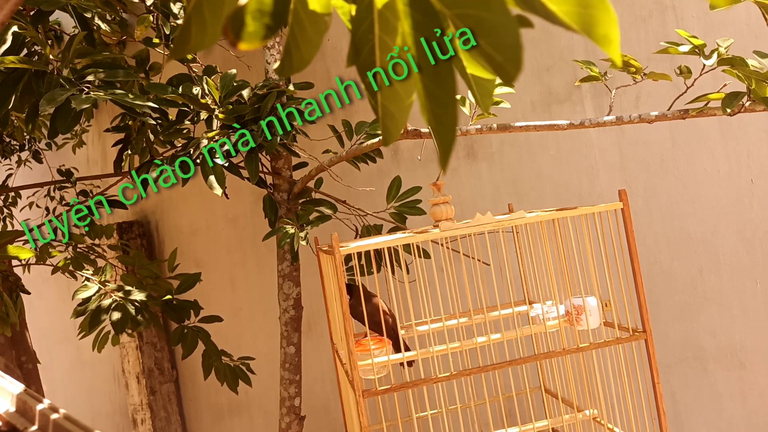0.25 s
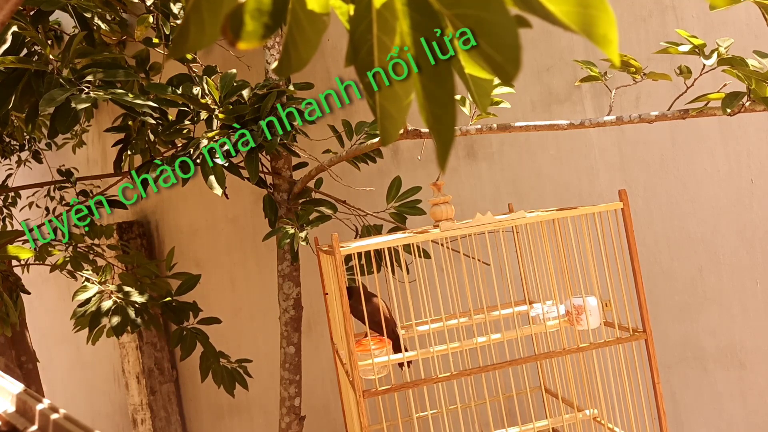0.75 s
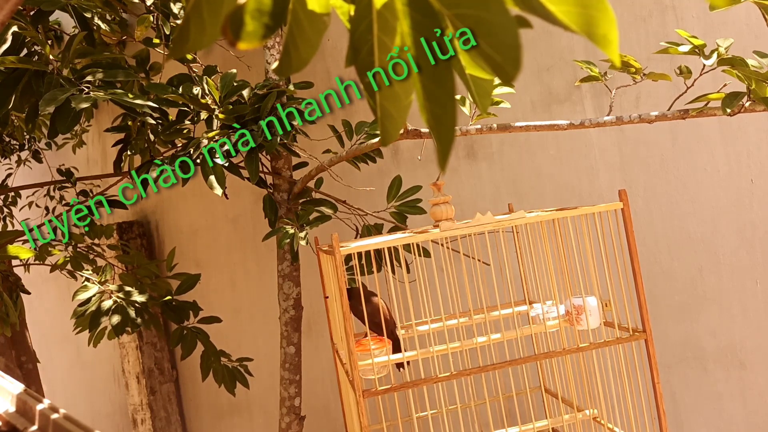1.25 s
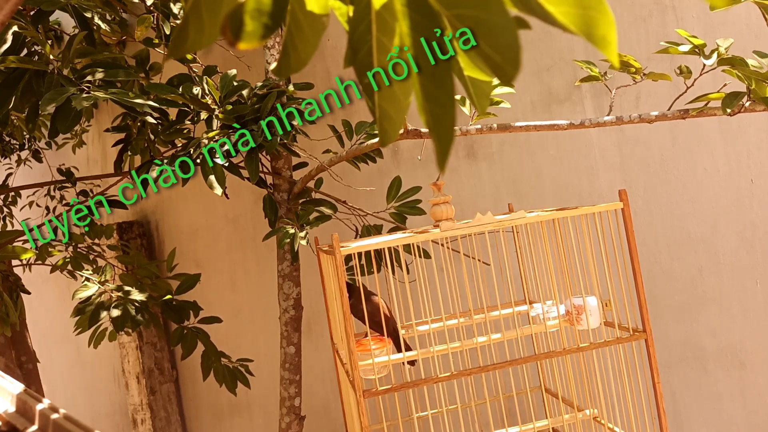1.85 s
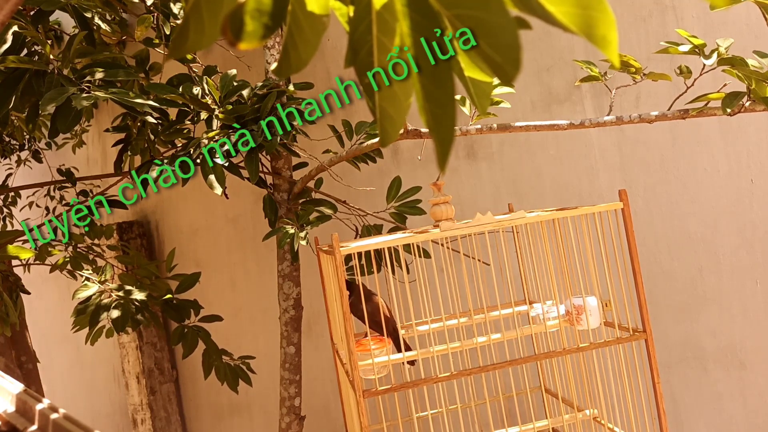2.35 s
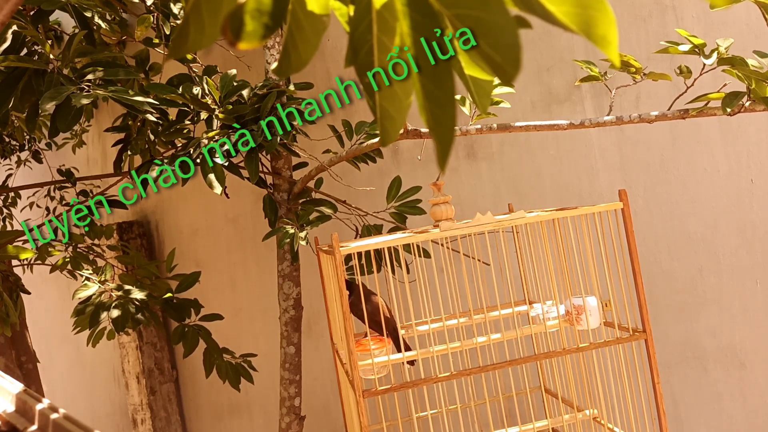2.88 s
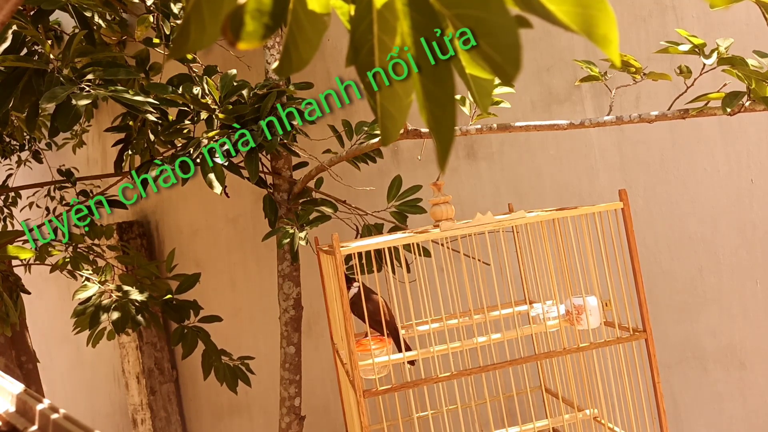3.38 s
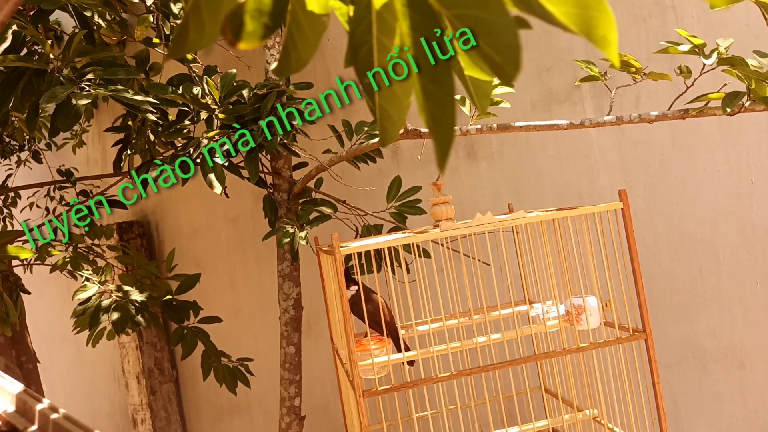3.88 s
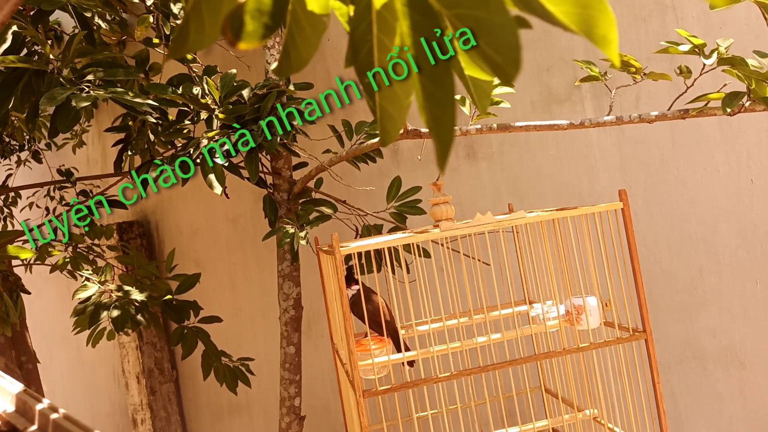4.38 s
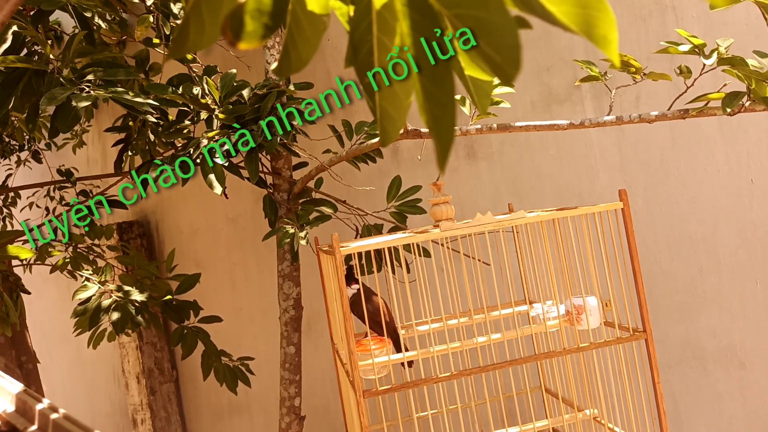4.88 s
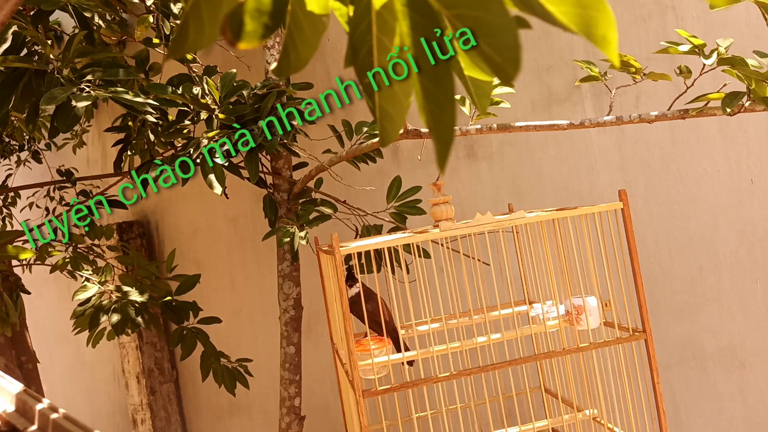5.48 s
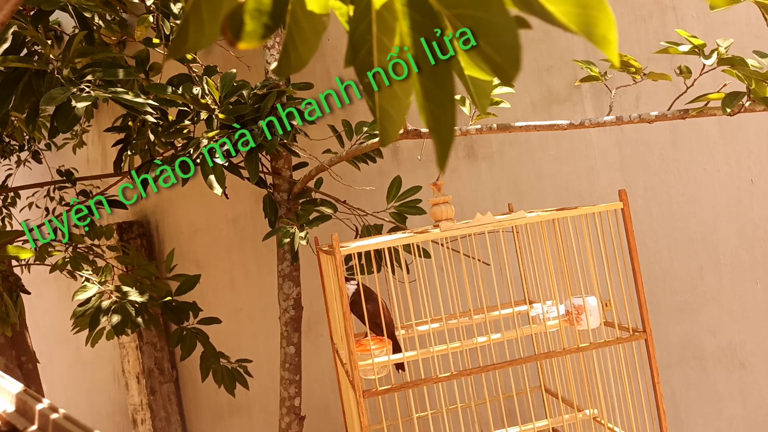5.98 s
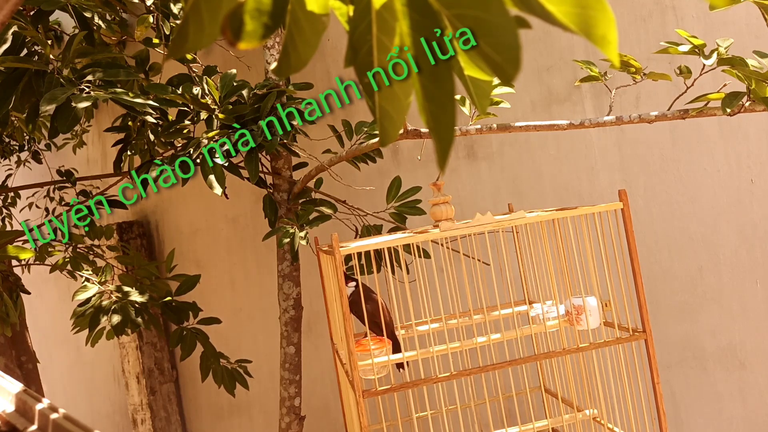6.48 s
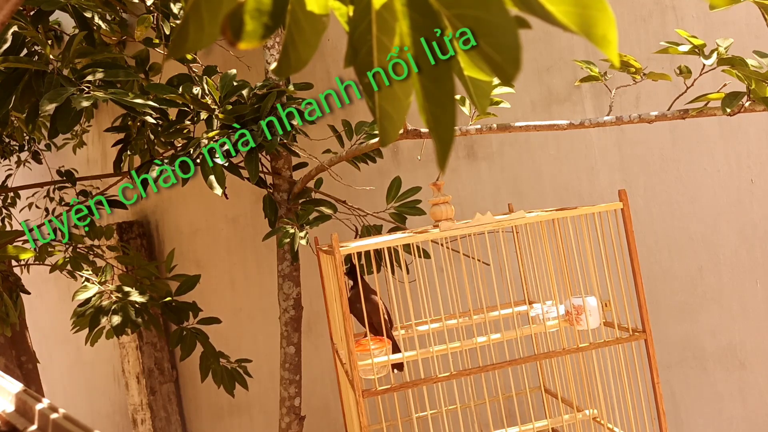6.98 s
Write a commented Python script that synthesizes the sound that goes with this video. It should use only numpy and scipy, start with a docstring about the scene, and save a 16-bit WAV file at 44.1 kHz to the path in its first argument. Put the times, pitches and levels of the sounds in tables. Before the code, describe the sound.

Scattered raspy chirps and a brief whistled song from a nearby bird, with constant high hiss and faint distant birds.

```python
"""A caged bulbul sings in a walled yard: four buzzy arched calls and a quick phrase of slurred whistles,
which it begins again at the end. Each note is one gliding tone, modulated in frequency and amplitude by
a fast trill; the near walls return it as early reflections and a faint reverberation.
Other birds answer from far off, over a steady high hiss, faint distant noise and a low outdoor rumble."""
import sys
import numpy as np
from scipy import signal
from scipy.fft import rfft, irfft
from scipy.io import wavfile

SR = 44100
rng = np.random.default_rng(int(sys.argv[2]) if len(sys.argv) > 2 else 0)


def dump(signal):
    """Clip the signal to [-1, 1] and save it as 16-bit WAV at the path in sys.argv[1]."""
    limited = np.clip(np.atleast_2d(signal).T, -1, 1)
    pcm = np.round(limited * 32767).astype(np.int16)
    wavfile.write(sys.argv[1], SR, pcm)


N = 319284
TIME = np.arange(N) / SR

# spectrum of still air: f/Hz, relative density/dB
AIR_SPECTRUM = [(25, -19.5), (45, -0.5), (110, 2), (260, -0.5), (450, -9), (800, -6.5), (1500, -19),
                (2500, -15), (3500, -15.5)]
# spectrum of the rumble: f/Hz, relative density/dB
RUMBLE_SPECTRUM = [(30, -25), (55, -9.5), (100, 7), (135, 5), (200, -18.5), (350, -34.5)]
# Gaussian swells of the rumble: t of peak/s, half-width/s, level/dB
RUMBLE_PEAKS = [(.06, .05, -66), (.59, 0.095, -62), (0.839, .04, -73), (2.25, 0.015, -69),
                (3.55, 0.058, -81), (3.929, 0.029, -74), (5.46, .08, -71), (6.77, .05, -71),
                (7.03, 0.046, -69), (7.23, 0.047, -68)]
# narrow bands of distant noise: f/Hz, mean level/dB
FAR_BANDS = [(230, -99.5), (330, -97), (460, -99), (620, -87.5), (850, -87.5), (1100, -91.5), (1500, -89.5),
             (2300, -91), (3000, -99.5)]
# spectrum of the hiss: f/Hz, relative density/dB
HISS_SPECTRUM = [(1650, -57.5), (2800, -37.5), (2990, -41), (3500, -31.5), (4940, -4.5), (6350, 2.5),
                 (7490, -1), (8000, -12.5), (8290, -11.5), (8720, -19), (9850, -25), (11700, -41.5),
                 (13600, -42), (14800, -33.5), (15600, -39)]
# narrow tones in the hiss: f/Hz, relative level/dB
HISS_TONES = [(5109, -82), (5728, -83.5), (6234, -72), (6584, -64), (7197, -73), (8193, -80.5)]
# distant chirps and low calls, likely birds: t/s, duration/s, start f/Hz, end f/Hz, relative level/dB
FAR_GLIDES = [(0.0, 0.16, 2982, 2683, -53.5), (0.0, .13, 696, 1169, -69), (0.009, 0.18, 1436, 1540, -66.5),
              (1.3, 0.283, 808, 846, -76), (1.652, 0.11, 2127, 2173, -73.5), (1.797, 0.23, 1850, 1894, -72),
              (1.816, 0.19, 1200, 1233, -78), (2.718, 0.48, 689, 894, -74), (3.165, 0.22, 1332, 1585, -72),
              (3.256, 0.11, 1017, 966, -72), (3.587, 0.086, 658, 711, -69), (3.642, .15, 263, 244, -76),
              (3.665, 0.093, 3244, 2700, -64.5), (3.959, 0.068, 2080, 2390, -64),
              (4.019, 0.27, 685, 726, -68.5), (4.08, 0.07, 3190, 3120, -67.5),
              (4.157, 0.14, 2057, 2230, -66), (4.272, 0.064, 2690, 3090, -61), (4.543, .11, 844, 613, -73),
              (4.899, 0.12, 331.4, 272, -78.5), (5.09, 0.38, 701, 707.4, -69.5),
              (5.658, 0.055, 2980, 4080, -53.5), (6.032, .089, 652, 862, -73.5),
              (6.078, .18, 2716, 2698, -60), (6.252, .24, 763, 681, -75.5), (6.555, 0.046, 4090, 2905, -65),
              (7.019, .1, 691, 799, -70)]
# early reflections from the near walls: delay/ms, level/dB
WALL_ECHOES = [(3.1, -10.5), (5.0, -19.5), (7.6, -8), (10.3, -16), (15.7, -21.5), (29.7, -19.5)]
# harmonics of the whistle: harmonic number, relative level/dB
HARMONICS = [(2, -32.5), (3, -40), (4, -46), (5, -39), (6, -40), (7, -43.5)]
# spectral weighting of harmonics and rasp: f/Hz, gain/dB
BUZZ_RESPONSE = [(600, -12), (1500, -17.5), (2500, 5), (4500, -2.5), (6200, 8.5), (7500, -1), (8500, 2),
                 (10300, -4.5), (12000, -8), (13600, -16), (15200, -1.5)]
# arched calls: t/s, rise/s, fall/s, start f/Hz, top f/Hz, end f/Hz, rise exponent, relative level/dB,
# initial trill rate/Hz, mean trill depth/Hz, early harshness/dB, final harshness/dB
ARCHED_CALLS = [(.251, 0.082, .056, 2460, 3394, 2808, 2.1, -21, 170.2, 185, -9, 3),
                (4.722, 0.079, .032, 3000, 3856, 3647, 1.8, -19.5, 296, 230, 14.5, 0),
                (5.905, .092, .014, 3034, 4098, 3990, 1.5, -18.5, 311.6, 220, 27, -5),
                (6.833, 0.079, .061, 2412, 3410, 2880, 2.02, -21.5, 219.4, 195, 2, 6.5)]
# syllables of the phrase: t in phrase/s, swell/s, fade/s, start f/Hz, f at peak/Hz, end f/Hz,
# relative level/dB, trill depth/Hz, harshness/dB
SYLLABLES = [(0.0, 0.025, 0.0095, 1390, 1498, 1520, -45, 70, 6),
             (0.024, .023, 0.02, 1853, 2292, 2671, -26.5, 78.9, 9.5),
             (.113, .019, 0.018, 1780, 1910, 2450, -32.5, 60.37, 9),
             (0.134, .017, 0.00602, 2286, 3027, 3100, -24.5, 120, 10),
             (0.152, 0.012, .022, 3120, 3125, 3230, -17.5, 35.6, 1.5),
             (.226, 0.0076, 0.027, 2400, 2550, 3048, -30, 200.3, 4),
             (.329, .027, 0.012, 3570, 3645, 3750, -14.5, 24.53, 5.5),
             (0.366, 0.012, 0.0085, 3720, 3677, 3515, -24, 25.1, 7),
             (.435, 0.018, .019, 1840, 2371, 2614, -26, 70, 10),
             (.468, .038, .01, 2570, 2800, 2950, -26.5, 87, 1.5),
             (.508, 0.0121, 0.027, 3060, 3680, 3410, -22, 173, 0),
             (0.587, 0.026, 0.029, 2004, 2460, 2700, -30.5, 211, 4),
             (0.645, 0.022, 0.04, 1592, 1714, 1684, -41, 140, 12)]
# entries of the phrase: t/s, gain/dB, frequency shift/Hz
PHRASE_ENTRIES = [(.625, 0, 2), (7.122, 1, 51)]

CUTOFF_HZ = 15650
NOTE_EDGE_S = .0048   # the voice switches on and off this fast


def from_db(db):
    """Amplitude ratio grows tenfold for every 20 dB."""
    return 10 ** (np.asarray(db) / 20)


def unit_rms(x):
    """Division by the root mean square gives unit power."""
    return x / np.sqrt(np.mean(x ** 2) + 1e-20)


def drift(rate_hz, size=N):
    """Smooth random modulation: interpolation between Gaussian values drawn at the given rate."""
    along = np.arange(size) * rate_hz / SR
    knots, step = rng.standard_normal(4096), along.astype(int)
    ease = np.sin(np.pi / 2 * (along - step)) ** 2
    return (1 - ease) * knots.take(step, mode="wrap") + ease * knots.take(step + 1, mode="wrap")


def coloured_noise(spectrum):
    """Spectral shaping of white noise, at unit power, with a steep roll-off outside the given range."""
    hz, db = np.transpose(spectrum)
    log_hz = np.log(np.maximum(np.fft.rfftfreq(N, 1 / SR), 1))
    outside = np.abs(log_hz - np.clip(log_hz, np.log(hz[0]), np.log(hz[-1])))
    gain = from_db(np.interp(log_hz, np.log(hz), db)) * np.exp(-10 * outside)
    return unit_rms(irfft(rfft(rng.standard_normal(N)) * gain, N))


def diffuse(x, t60_s):
    """Diffuse reverberation: convolution with exponentially decaying noise of unit energy."""
    t = TIME[:SR]
    echoes = rng.standard_normal(SR) * from_db(-60 * t / t60_s) * np.minimum(t / 0.0029, 1)
    return signal.fftconvolve(x, echoes / np.linalg.norm(echoes))[:N]


def air_and_rumble(air_db=-84, rumble_db=-82.5):
    """Ambient noise: a steady floor of still air, and a low rumble under slow amplitude modulation."""
    lumps = from_db(rumble_db + 3 * drift(13))
    swells = sum(from_db(db) * np.exp(-((TIME - s) / width) ** 2) for s, width, db in RUMBLE_PEAKS)
    air = from_db(air_db) * coloured_noise(AIR_SPECTRUM)
    return air + (lumps + swells) * coloured_noise(RUMBLE_SPECTRUM)


def far_wash(swell_db=7, spread=0.078):
    """Random frequency modulation spreads tones into noise bands that swell and echo between houses."""
    bands, common_db = np.zeros(N), -5.5 * drift(6)
    for centre_hz in np.geomspace(FAR_BANDS[0][0], FAR_BANDS[-1][0], 30):
        db = np.interp(centre_hz, *np.transpose(FAR_BANDS)) + common_db + swell_db * drift(7)
        hz = centre_hz * (1 + spread * drift(300))
        bands += from_db(db) * np.sin(2 * np.pi * np.cumsum(hz) / SR)
    return diffuse(bands, t60_s=0.071)


def hiss(band_db=-52, tone_gain_db=-3, line_width_hz=14):
    """Interference with its echoes ripples a high hiss, likely far insects; narrow tones stand out."""
    band = coloured_noise(HISS_SPECTRUM)
    band = unit_rms(band + from_db(-5) * diffuse(band, t60_s=0.2685))
    tones = np.zeros(N)
    for hz, db in HISS_TONES:
        amplitude = np.sqrt(2) * from_db(db) * drift(2 * line_width_hz)
        tones += amplitude * np.sin(2 * np.pi * hz * TIME + drift(line_width_hz))
    return from_db(band_db) * band + from_db(tone_gain_db) * tones


def far_birds():
    """Far from a source the reverberant field dominates: these gliding calls arrive only as echoes."""
    calls = np.zeros(N)
    wobble = 1 + 0.066 * drift(200) + 0.041 * drift(22)
    for s, length, start_hz, end_hz, db in FAR_GLIDES:
        span = np.flatnonzero((TIME > s) & (TIME < s + length))
        along = (TIME[span] - s) / length
        pitch = (start_hz + (end_hz - start_hz) * along) * wobble[span]
        envelope = 2 * from_db(db) * np.sin(np.pi * along)
        calls[span] += envelope * np.sin(2 * np.pi * np.cumsum(pitch) / SR)
    return diffuse(calls, t60_s=0.58)


def yard(direct):
    """Superposition of direct sound, wall reflections, scattering by cage and leaves, and reverberation."""
    walls = sum(from_db(db) * np.interp(TIME - ms / 1000, TIME, direct, left=0)
                for ms, db in WALL_ECHOES)
    scatter = from_db(-7) * diffuse(direct, t60_s=0.1)
    reverberation = from_db(-20) * diffuse(direct, t60_s=0.56)
    return direct + walls + scatter + reverberation


def note_span(s, rise_s, fall_s):
    """Normalised time: a note's samples, its clock, and the distance (0-1) before and after its peak."""
    span = np.flatnonzero((TIME > s - NOTE_EDGE_S) & (TIME < s + rise_s + fall_s + NOTE_EDGE_S))
    t = TIME[span] - s
    return span, t, np.clip(1 - t / rise_s, 0, 1), np.clip((t - rise_s) / fall_s, 0, 1)


def syrinx(t, hz, db, depth_hz, trill_hz, waver_hz=25):
    """Frequency and amplitude modulation of one note by an uneven trill that slows as it goes."""
    rate_hz = np.interp(t, [t[0], t[-1]], trill_hz) * (1 + .14 * drift(150, len(t)))
    trill = np.sin(2 * np.pi * np.cumsum(rate_hz) / SR)
    pitch = hz + depth_hz * trill + waver_hz * drift(400, len(t))
    from_edge_s = np.minimum(t - t[0], t[-1] - t)
    gate = np.sin(np.pi / 2 * np.clip(from_edge_s / NOTE_EDGE_S, 0, 1)) ** 2
    tremolo = 1 + 0.067 * depth_hz / 300 * trill
    return pitch, from_db(db) * gate * tremolo


def arched_calls(attack_s=0.028, attack_db=24, release_s=.016, release_db=13):
    """Power-law glides rise to a rounded top and sink; the level holds between attack and release."""
    for (s, rise_s, fall_s, start_hz, top_hz, end_hz, bend, level_db,
         rate_hz, depth_hz, early_harsh_db, end_harsh_db) in ARCHED_CALLS:
        span, t, before, after = note_span(s, rise_s, fall_s)
        length = rise_s + fall_s
        along = np.clip(t / length, 0, 1)
        hz = top_hz + (start_hz - top_hz) * before ** bend + (end_hz - top_hz) * after ** 1.5
        attack = np.clip(1 - t / attack_s, 0, 1)
        release = np.clip(1 - (length - t) / release_s, 0, 1)
        db = level_db - attack_db * attack ** 2 - release_db * release ** 2
        harsh_db = early_harsh_db + (end_harsh_db - early_harsh_db) * along ** .5
        harsh_db -= 11 * attack   # the voice is cleaner until the attack has built up
        swing_hz = depth_hz * (1 + 0.13 * (1 - 2 * along))   # the trill narrows
        yield span, *syrinx(t, hz, db, swing_hz, trill_hz=(rate_hz, 110)), from_db(harsh_db)


def song_syllables(swell_db=16.5, fade_db=13.5, bend=1.07):
    """Linear glides join three frequencies in each syllable, under a near-exponential swell and fade."""
    for entry_s, gain_db, shift_hz in PHRASE_ENTRIES:
        for s, rise_s, fall_s, start_hz, peak_hz, end_hz, level_db, depth_hz, harsh_db in SYLLABLES:
            if entry_s + s < TIME[-1]:
                span, t, before, after = note_span(entry_s + s, rise_s, fall_s)
                hz = shift_hz + peak_hz + (start_hz - peak_hz) * before + (end_hz - peak_hz) * after
                db = gain_db + level_db - swell_db * before ** bend - fade_db * after ** bend
                yield span, *syrinx(t, hz, db, depth_hz, trill_hz=(210, 180)), from_db(harsh_db)


def bulbul(flutter_rad=.25):
    """Nearly sinusoidal whistles; harshness adds shimmer, harmonics, subharmonic tones and rasp."""
    whistle, treble = np.zeros(N), np.zeros(N)
    rasp = from_db(-47) * coloured_noise(BUZZ_RESPONSE)
    for span, pitch, amplitude, harshness in [*arched_calls(), *song_syllables()]:
        shimmer_db = 2.27 * np.sqrt(harshness) * drift(450, len(span))
        amplitude = amplitude * from_db(shimmer_db)
        phase = 2 * np.pi * np.cumsum(pitch) / SR
        subharmonics = from_db(-55) * (np.sin(phase / 2) + np.sin(1.5 * phase))
        buzz = rasp[span] + subharmonics
        for number, db in HARMONICS:
            hz = number * pitch
            gain = from_db(db + np.interp(hz, *np.transpose(BUZZ_RESPONSE))) * (hz < CUTOFF_HZ)
            buzz += gain * np.sin(number * phase + flutter_rad * drift(900, len(span)))
        whistle[span] += amplitude * np.sqrt(2) * np.sin(phase)
        treble[span] += amplitude * harshness * buzz
    # the beak beams the treble away, so much of it arrives by way of the walls
    reflected = from_db(-3) * diffuse(treble, t60_s=0.022)
    return from_db(-1) * (whistle + treble + reflected)


def scene():
    """Sound pressures add: the bulbul in its yard and everything farther off, in one channel."""
    return (yard(bulbul()) + far_birds() + far_wash() + hiss() + air_and_rumble())[None]


def record(dry):
    """An elliptic low-pass filter cuts the highest treble steeply."""
    return signal.sosfilt(signal.ellip(12, .1, 80, CUTOFF_HZ, fs=SR, output="sos"), dry)


dry = scene()
out = record(dry)
dump(out)
```